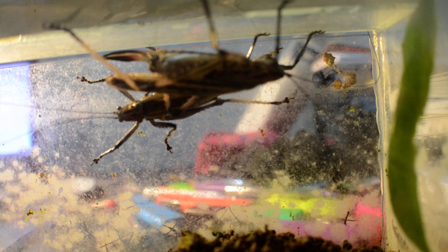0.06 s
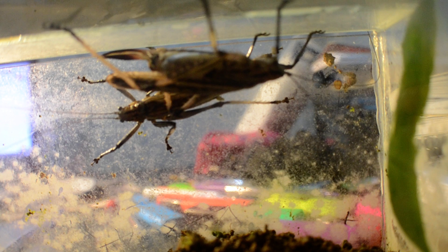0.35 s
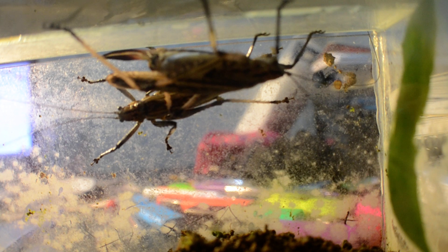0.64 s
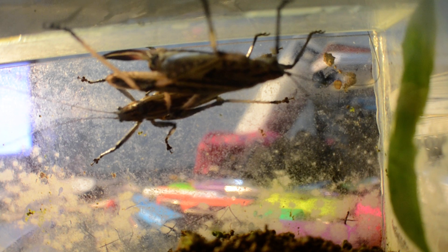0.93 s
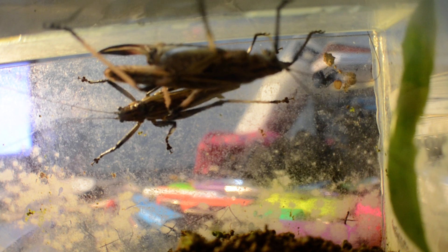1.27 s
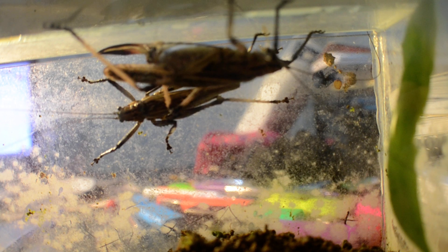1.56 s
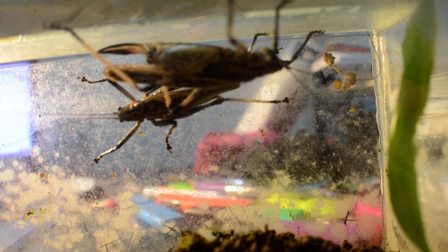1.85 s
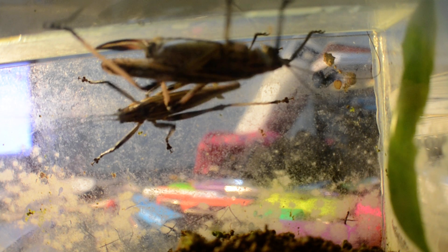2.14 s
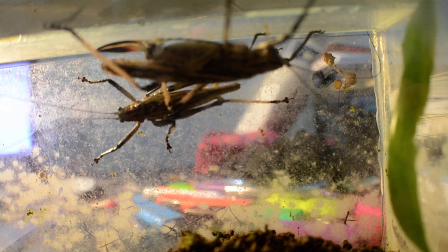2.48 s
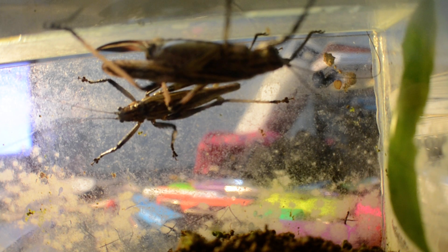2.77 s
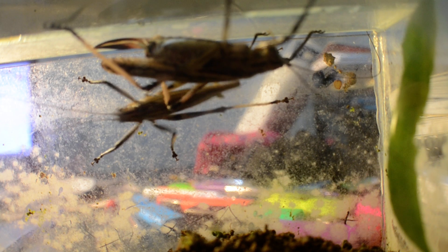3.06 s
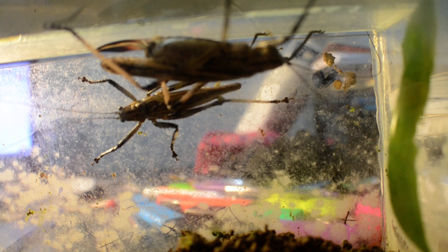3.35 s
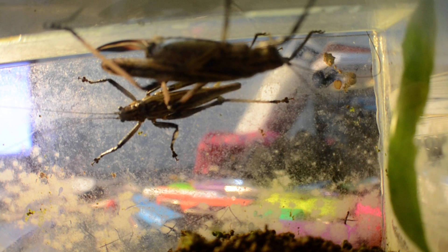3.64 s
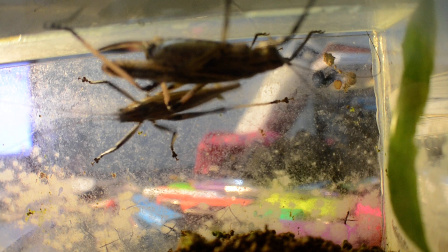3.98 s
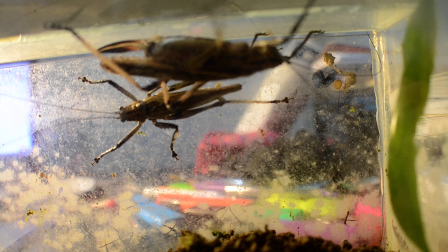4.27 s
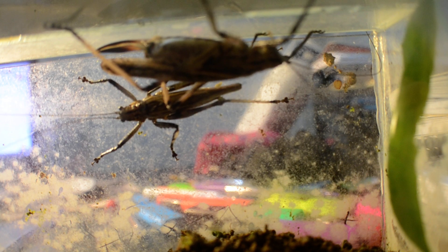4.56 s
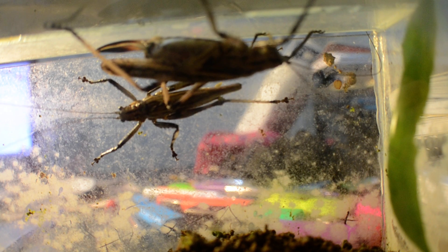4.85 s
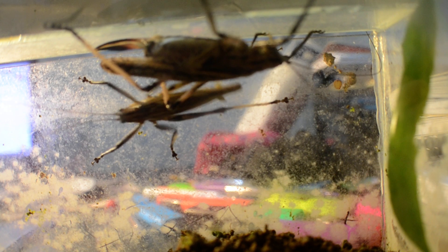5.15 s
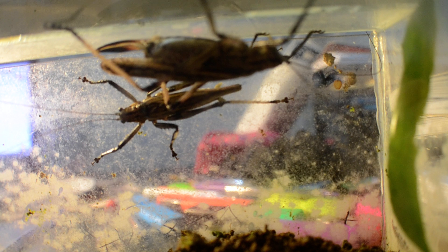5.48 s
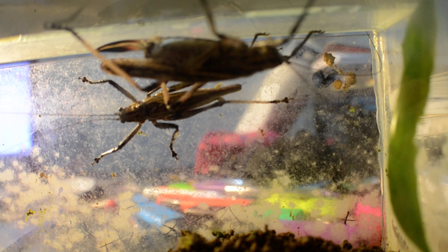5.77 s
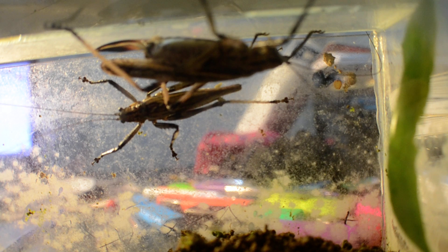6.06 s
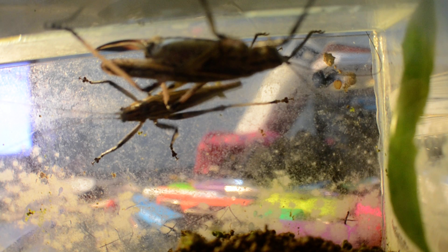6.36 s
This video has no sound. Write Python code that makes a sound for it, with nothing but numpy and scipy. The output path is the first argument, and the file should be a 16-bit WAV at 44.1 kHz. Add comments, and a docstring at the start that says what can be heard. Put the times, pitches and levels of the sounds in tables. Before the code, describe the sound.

A bush-cricket drums on the wall of a small plastic box, heard close up in a quiet room. After one faint tap, quick rolls of about five taps come roughly once a second, six in all. Each tap is a hollow thump with a bright ping and a tiny tick. Faint high rasps and soft scuffs come and go over a low, steady hiss.

```python
"""A quiet room, a bush-cricket in a small plastic box. It drums on the box wall in rolls of up to
five quick taps, about one roll a second. Each tap rings the wall: a hollow thump from its flexing
modes, a bright ping from its stiff modes, a noise tick at the contact. The room adds a dull tail.
Faint high rasps and soft scuffs come and go over a steady hiss."""
import sys
import numpy as np
from scipy import signal
from scipy.fft import rfft, irfft, next_fast_len
from scipy.io import wavfile

SR = 44100
rng = np.random.default_rng(int(sys.argv[2]) if len(sys.argv) > 2 else 0)


def file_out(sig):
    """Save sig as 16-bit WAV at sys.argv[1]."""
    # one column per channel
    cols = np.atleast_2d(sig).T
    # limit, then scale
    lim = np.clip(cols, -1, 1)
    pcm = np.round(lim * 32767).astype(np.int16)
    wavfile.write(sys.argv[1], SR, pcm)


N = 287532


def amp(db):
    """Decibels to gain."""
    return 10 ** (np.asarray(db) / 20)


def along(points, hz):
    """(freq_hz, value) points interpolated on a log frequency axis."""
    freqs_hz, values = np.transpose(points)
    return np.interp(np.log(hz + 1), np.log(freqs_hz + 1), values)


def filtered(x, response):
    """Zero-phase filter with gain response(hz)."""
    size = next_fast_len(len(x) + SR // 4)
    hz = np.fft.rfftfreq(size, 1 / SR)
    return irfft(rfft(x, size) * response(hz), size)[:len(x)]


def noise(shape_db):
    """Noise at rms 1 with spectrum shape_db(hz)."""
    x = filtered(rng.standard_normal(N), lambda hz: amp(shape_db(hz)))
    return x / np.sqrt(np.mean(x ** 2) + 1e-20)


def bell(hz, centre_hz, width_hz):
    """Resonance curve, 1 at the centre."""
    return 1 / (1 + (2 * (hz - centre_hz) / width_hz) ** 2)


def fade(t, t60_s):
    """Exponential decay, 60 dB down at t60_s."""
    return np.exp(-np.log(1000) * t / t60_s)


def swell(start_s, length_s):
    """Envelope: rise to 1 in a quarter of length_s, slower fall."""
    age = np.maximum(np.arange(N) / SR - start_s, 0) / length_s * 4
    return age * np.exp(1 - age)


def add(track, start_s, sound):
    """Mix sound into track at start_s."""
    part = track[round(start_s * SR):][:len(sound)]
    part += sound[:len(part)]


def background(hiss_db=-64.0, hum_hz=180, hum_db=-87):
    """Steady hiss with narrow resonances, plus a faint hum."""
    # hiss spectrum: freq_hz, relative_db
    spectrum = [(20, -23), (50, -15.5), (100, -8.5), (230, -2.5), (480, 1.5), (750, -2), (1250, -2.5),
                (1800, -7.5), (2800, -10.5), (4000, -15.5), (5200, -18), (7000, -23.5), (7900, -31),
                (8500, -26.5), (10200, -31.5), (11400, -45)]
    # resonances in the hiss: centre_hz, width_hz, lift_db
    peaks = [(1517, 38, 6), (2296, 140, 12), (3103, 86, 7.5), (3611, 124, 9.5), (3900, 94, 2.5),
             (4290, 122, 8.5), (4468, 188, 9.5), (4710, 120, 3.5)]
    hiss = noise(lambda hz: along(spectrum, hz)
                 + sum(lift_db * bell(hz, centre_hz, width_hz) for centre_hz, width_hz, lift_db in peaks))
    hum = np.sqrt(2) * np.sin(2 * np.pi * hum_hz * np.arange(N) / SR)
    return amp(hiss_db) * hiss + amp(hum_db) * hum


def room(x, build_s=0.026, lowpass_hz=2500):
    """Diffuse tail: builds gradually, loses its treble first."""
    # room decay: freq_hz, t60_s
    decay_times = [(150, 0.38), (420, 0.38), (1000, 0.68), (2400, 0.32), (9000, 0.25)]
    hz, t, bands = signal.stft(rng.standard_normal(SR * 3 // 4), SR, nperseg=256)
    decay = fade(t, along(decay_times, hz)[:, None])
    build_up = 1 - np.exp(-(t / build_s) ** 2)
    _, tail = signal.istft(bands * decay * build_up, SR, nperseg=256)
    wet = signal.fftconvolve(x, tail / np.linalg.norm(tail))[:N]
    return filtered(wet, lambda hz: 1 / np.sqrt(1 + (hz / lowpass_hz) ** 2))


def scuffs(width_hz=380):
    """Soft, dull rustles: swells of band noise close to the hiss level."""
    # scuffs: start_s, length_s, centre_hz, level_db
    events = [(0.283, 0.082, 1500, -70.5), (0.574, 0.23, 1030, -63.5), (0.893, 0.18, 870, -69.5),
              (3.113, 0.34, 1016, -66), (5.43, 0.33, 626, -66)]
    track = np.zeros(N)
    for start_s, length_s, centre_hz, level_db in events:
        rustle = noise(lambda hz: 20 * np.log10(bell(hz, centre_hz, width_hz)))
        track += amp(level_db) * swell(start_s, length_s) * rustle
    return track


def rasps():
    """Brief dry rubbing: a broad hiss and a thin, very high sizzle."""
    # rasps: start_s, length_s, broad_db, sizzle_db
    events = [(.59, .12, -96, -88.5), (1.094, 0.025, -77, -85), (1.948, .04, -84, -88),
              (2.93, .05, -85, -88), (3.93, .06, -76, -85.5), (4.117, 0.16, -66, -84),
              (4.756, .07, -85, -91), (5.02, .09, -78, -87), (5.18, 0.17, -79, -93)]
    # spectra of the two bands: freq_hz, relative_db
    broad_spectrum = [(1500, -15), (3000, 9), (4500, 0.5), (6400, 2.5), (7900, -5.5), (8800, 2.5),
                      (10200, -14), (11500, -31)]
    sizzle_spectrum = [(7800, -30), (8800, -7), (9500, 5.5), (10200, -9), (11500, -15)]
    broad = noise(lambda hz: along(broad_spectrum, hz))
    sizzle = noise(lambda hz: along(sizzle_spectrum, hz))
    return sum(swell(start_s, length_s) * (amp(broad_db) * broad + amp(sizzle_db) * sizzle)
               for start_s, length_s, broad_db, sizzle_db in events)


def taps(last_lag_s=0.003, accent_to_thump=0.25, tick_growth=0.6, skid_s=4.136, skid_loss_db=15):
    """Tap force arches over each full roll. Yields time_s, thump_db, ping_db, tick_db."""
    # rolls: start_s, tap_count, gap_s, mid_force_db, rise_db_per_tap, end_droop_db,
    # hardness_db, hardening_db_per_tap, accent_db
    rolls = [(0.296, 1, .05, -59.5, 0, 0, -4, 0, 0), (1.0324, 2, 0.052, -45, -3.5, -2, -16, -6, 1),
             (1.1311, 3, .051, -35, -4.7, -1, -9, -3.5, 5.5), (2.0021, 5, 0.05, -29, -0.56, 9.5, -2, -1, 6),
             (2.9715, 5, 0.05, -28, -1.2, 3.5, 0.5, 2, 6),
             (3.9876, 5, .0495, -26.5, 0.17, 5, 0.5, -.4, 3.5),
             (5.024, 5, 0.051, -28.5, -0.6, 5.5, 2, 1.6, -2.5),
             (6.2768, 4, .0519, -30.5, 1.1, 10, -0.1, -2, 0)]
    # five strokes of a full roll (short rolls use the last ones): ping_offset_db, tick_offset_db
    strokes = [(-10, -35), (-14, -27.5), (-12, -30), (-10.5, -27), (-10, -35)]
    for start_s, count, gap_s, mid_db, rise_db, droop_db, hardness_db, hardening_db, accent_db in rolls:
        count = round(count)
        for k, (ping_offset_db, tick_offset_db) in enumerate(strokes[-count:]):
            time_s = start_s + k * gap_s + last_lag_s * (0 < k == count - 1)
            from_middle = k - (count - 1) / 2
            arch_db = rise_db * from_middle - droop_db * (from_middle / 2) ** 2
            force_db = mid_db + arch_db
            bright_db = force_db + hardness_db + hardening_db * from_middle
            boost_db = accent_db * (k == count - 2)
            # one tap glances off the wall: it pings but hardly thumps
            loss_db = skid_loss_db * (abs(time_s - skid_s) < gap_s / 2)
            thump_db = force_db + accent_to_thump * boost_db - loss_db
            ping_db = bright_db + ping_offset_db + boost_db
            tick_db = bright_db + tick_offset_db + tick_growth * arch_db - loss_db
            yield time_s, thump_db, ping_db, tick_db


def drumming(ping_gain_db=4, tick_gain_db=3, tick_t60_s=0.03, scatter_db=2.4, contact_s=0.00046):
    """Every tap rings the same wall; harder contacts excite its stiff modes more."""
    # slow flexing modes of the wall: freq_hz, t60_s, signed_gain
    flex_modes = [(359.3, 0.032, 0.454), (373.8, 0.14, -0.47), (398.8, 0.053, -1), (441.7, 0.069, 0.99),
                  (493, 0.12, 0.1)]
    # stiff modes of the wall: freq_hz, t60_s, relative_db
    stiff_modes = [(657, 0.035, -19.5), (1135, 0.047, -18), (1833, 0.084, -27.5), (2279, 0.086, -4.5),
                   (2458, 0.059, -10), (2572, 0.085, -24.5), (3020, 0.032, -18.5), (3163, 0.015, -16.5),
                   (3960, 0.046, -27), (4110, 0.033, -30.5), (5100, 0.036, -33.5), (5990, 0.03, -29.5),
                   (6340, 0.028, -35.5), (6990, 0.032, -42.5), (8750, 0.019, -37.5)]
    # contact tick spectrum: freq_hz, relative_db
    tick_spectrum = [(300, -6), (1000, 18.5), (3000, 17.5), (5000, 5), (6300, 9), (7900, -7.5), (8800, 8.5),
                     (10000, -6.5), (11500, -30)]
    wall, t = np.zeros(N), np.arange(SR // 3) / SR
    # close modes start in opposite phase: the thump swells, then beats
    thump = sum(gain * np.sin(2 * np.pi * hz * t) * fade(t, t60_s) for hz, t60_s, gain in flex_modes)
    # neighbouring stiff modes push the air in opposite directions
    partials = np.array([(-1) ** k * amp(db) * np.sin(2 * np.pi * hz * t) * fade(t, t60_s)
                         for k, (hz, t60_s, db) in enumerate(stiff_modes)])
    grit = noise(lambda hz: along(tick_spectrum, hz))
    onset = 1 - np.exp(-t / contact_s)
    for time_s, thump_db, ping_db, tick_db in taps():
        # the contact point shifts, and with it the mix of modes
        ping = amp(scatter_db * rng.standard_normal(len(stiff_modes))) @ partials
        tick = np.roll(grit, -round(time_s * SR))[:len(t)] * fade(t, tick_t60_s)
        bright = amp(ping_db + ping_gain_db) * ping + amp(tick_db + tick_gain_db) * tick
        add(wall, time_s, amp(thump_db) * thump + onset * bright)
    return wall


def scene(room_db=-13):
    """The box close by, the room around it; mono."""
    box = drumming() + rasps()
    return (box + amp(room_db) * room(box) + scuffs() + background())[None]


def record(dry):
    """Brick-wall low-pass."""
    cutoff_hz = 11400
    return filtered(dry[0], lambda hz: hz < cutoff_hz)[None]


dry = scene()
out = record(dry)
file_out(out)
```